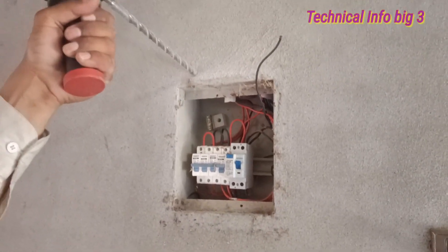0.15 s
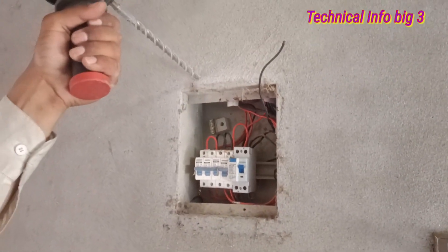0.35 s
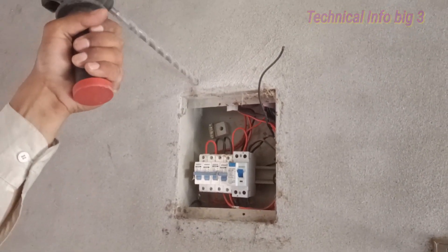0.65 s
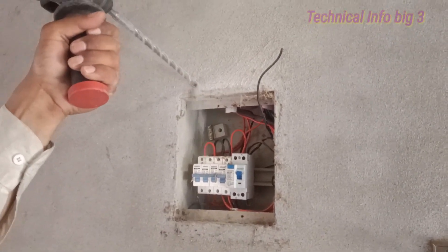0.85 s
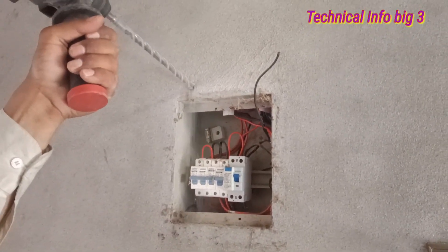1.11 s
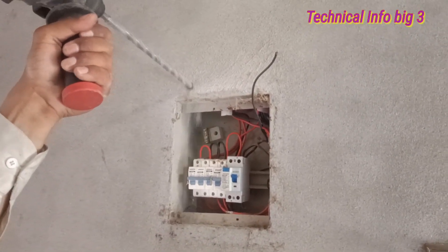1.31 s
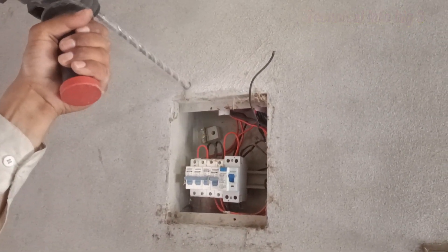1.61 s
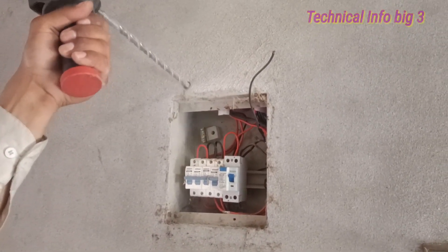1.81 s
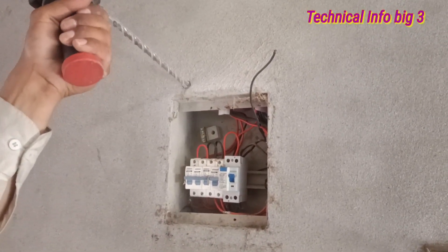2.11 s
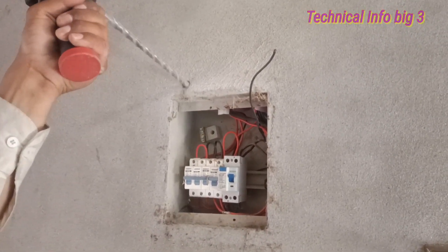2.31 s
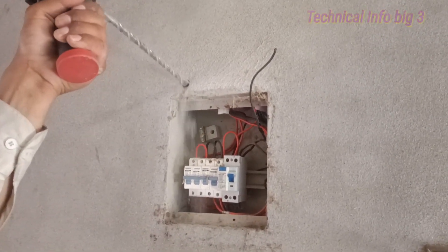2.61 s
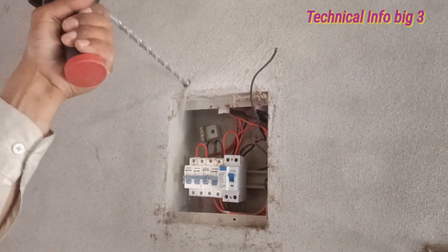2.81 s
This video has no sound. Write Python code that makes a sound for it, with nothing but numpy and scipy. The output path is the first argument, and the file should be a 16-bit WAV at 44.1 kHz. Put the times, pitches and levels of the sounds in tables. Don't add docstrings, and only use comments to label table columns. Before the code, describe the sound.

A hammer drill, very close in a bare, echoing plaster room, whines and hisses up, then coasts down by 0.55 s with scattered ticks. A louder second spin peaks near 0.8 s and sags; a third climbs highest around 1.5 s. From 1.7 s steel blows crack, ring and boom in the wall, slowing toward 2.2 s. Faster, slightly clipped hammering surges at 2.35-2.75 s, then slows. Faint street rumble.

```python
import sys
import numpy as np
from scipy import signal
from scipy.fft import rfft, irfft, next_fast_len
from scipy.io import wavfile
from scipy.ndimage import uniform_filter1d, map_coordinates

SR = 44100
rng = np.random.default_rng(int(sys.argv[2]) if len(sys.argv) > 2 else 0)


def unload_audio(sound):
    columns = np.transpose(np.atleast_2d(sound))
    steps = np.round(np.clip(columns, -1, 1) * 32767)
    wavfile.write(sys.argv[1], SR, steps.astype(np.int16))


def makeup_ratio(level_db):
    decades = np.asarray(level_db, float) / 20
    return 10 ** decades


N = 130095


def unit(x):
    return x / np.sqrt(np.mean(x ** 2) + 1e-20)


def along(points, hz):
    point_hz, value = np.transpose(points)
    return np.interp(np.log(hz + 1), np.log(point_hz + 1), value)


def wobble(rate_hz):
    knots = rng.standard_normal(int(N * rate_hz / SR) + 4)
    return map_coordinates(knots, [np.arange(N) * rate_hz / SR])


def filtered(x, response):
    size = next_fast_len(N + SR // 2)
    spectrum = rfft(x, size) * response(np.fft.rfftfreq(size, 1 / SR))
    return irfft(spectrum, size)[..., :N]


def coloured(x, curve):
    return filtered(x, lambda f: makeup_ratio(along(curve, f)))


def body(peaks):
    def response(f):
        total = 0
        for k, (hz, width, db) in enumerate(peaks):
            total = total + (-1) ** k * makeup_ratio(db) * 1j * f * width / (hz * hz - f * f + 1j * f * width)
        return total
    return response


# start_s, crack_db, low_ring_db, high_ring_db, wall_db
BLOWS = [(1.7063, -5, -26, -26, -22.5), (1.7357, 1, -17, -29, -14), (1.7666, -2, -25, -25, -14.5),
         (1.8003, -1, -17, -29, -9.5), (1.8378, -16, -15.5, -25, -13), (1.8758, -4, -25, -26, -14),
         (1.9195, -5.5, -20.5, -31, -14.5), (1.9685, -1.5, -17, -23, -15), (2.0243, -5.5, -24, -27, -16),
         (2.0925, -12, -18.5, -33, -17), (2.1297, -34, -39, -48, -21), (2.2027, -13, -28, -25, -23),
         (2.3014, -11, -23, -27, -23.5), (2.3532, -0.5, -28, -31, -15.5), (2.3881, 0, -17, -18, -14.5),
         (2.4202, -2, -15, -29, -10), (2.4504, -8, -17, -34, -14), (2.4759, -0.5, -18, -30, -14.5),
         (2.5043, -4, -16, -24, -12), (2.5296, 4, -28, -23, -9), (2.5596, 1.5, -22, -10.5, -12.5),
         (2.5835, -9, -13, -20, -14), (2.6127, 0.5, -16, -16, -12), (2.6436, -3, -12, -26, -17.5),
         (2.6785, -4, -16, -23, -13), (2.7152, -6, -16.5, -16, -17), (2.7576, -5, -21.5, -24, -16.5),
         (2.805, -12, -28, -43, -25), (2.8637, -13, -39, -25, -22), (2.9354, -14, -36, -38, -29)]
# start_s, level_db
TICKS = [(.0353, -19), (.079, -15), (.106, -15), (.122, -12), (.148, -13), (.233, -6), (.251, -13),
         (.294, -11), (.358, -17), (.451, -21), (.475, -17), (.49, -23), (.599, -22), (.621, -15),
         (.695, -7), (.745, -7), (1.051, -12), (1.106, -10), (1.157, -14), (1.233, -10), (1.369, -9),
         (2.211, -25)]
# pitch_hz, t60_s, level_db (over its ring column)
BIT_MODES = [(8420, .025, 6), (11550, .08, -3)]
# freq_hz, level_db
BLOW_COLOUR = [(200, -30), (3000, -14), (6000, -5), (8500, 0), (12000, -3), (15000, -7)]
# freq_hz, level_db
TICK_COLOUR = [(200, -24), (1000, -9), (2500, 0), (5000, -3), (8000, -9), (15000, -14)]


def steel(events, colour):
    crack_t60_s, rebound_s, rebound_db, ring_scatter_db = 0.007, 0.003, -2, 2
    rings, cracks = np.zeros((2, N + SR)), np.zeros((2, N + SR))
    t = np.arange(SR // 12) / SR
    for start_s, crack_db, *ring_db in events:
        rebound = (rebound_s * rng.uniform(0.29, 1.2), rebound_db)
        for late_s, loss_db in ((0, 0), rebound):
            start = round((start_s + late_s) * SR)
            at = slice(start, start + len(t))
            for (hz, t60, mode_db), level in zip(BIT_MODES, ring_db):
                phase = 2 * np.pi * (hz * rng.normal(1, 0.012) * t + rng.random((2, 1)))
                scatter = rng.normal(0, ring_scatter_db)
                rings[:, at] += makeup_ratio(level + loss_db + mode_db + scatter - 60 * t / t60) * np.sin(phase)
            fall = makeup_ratio(crack_db + loss_db - 60 * t / crack_t60_s)
            cracks[:, at] += fall * rng.standard_normal((2, len(t)))
    return rings[:, :N] + makeup_ratio(-0.5) * coloured(cracks[:, :N], colour)


# pitch_hz, width_hz, level_db
WALL = [(134, 173, -18), (406.3, 17.4, -5.5), (475, 12, 4.5), (505.3, 15, -1), (546.2, 14, -3),
        (619, 24.5, -2), (677, 48, -10), (1320, 146, -14)]


def wall_boom(motor_db):
    rise_s, shudder_t60_s, low_hz = 0.0056, 0.042, 108
    push_db, thump_db, shake_db = 27.5, 21.5, 4
    push = np.zeros(N)
    for start_s, *_, wall_db in BLOWS:
        push[round(start_s * SR)] = makeup_ratio(wall_db)
    t = np.arange(SR // 5) / SR
    shape = (1 - np.exp(-t / rise_s)) * makeup_ratio(-60 * t / shudder_t60_s)
    shudder = signal.fftconvolve(push, shape)[:N] * rng.standard_normal(N)
    shake = makeup_ratio(motor_db) * rng.standard_normal(N)
    force = makeup_ratio(push_db) * (shudder + makeup_ratio(thump_db) * push) + makeup_ratio(shake_db) * shake
    return filtered(force, lambda f: body(WALL)(f) * (1j * f / (low_hz + 1j * f)) ** 2)


# pitch_hz, width_hz, level_db
GRIND = [(8100, 990, -7), (11350, 690, -1), (14200, 16000, -5.5)]


def bit_grind():
    ease_s, grind_db = 0.041, -21
    bite = np.zeros(N)
    for start_s, crack_db, *_ in BLOWS:
        bite[round(start_s * SR)] = makeup_ratio(crack_db)
    t = np.arange(SR // 5) / SR
    pressure = signal.fftconvolve(bite, np.exp(-t / ease_s))[:N]
    return makeup_ratio(grind_db) * pressure * unit(filtered(rng.standard_normal((2, N)), body(GRIND)))


# time_s, level_db, gear_mesh_hz
FIRST_PULL = [
    (0, -36, 240),
    (.033, -27, 300),
    (.038, -22.5, 330),
    (.11, -18, 500),
    (.2, -17, 570),
    (.3, -18, 481),
    (.43, -28.5, 360),
    (.49, -29.5, 291),
    (.56, -36, 225),
]
# time_s, level_db, gear_mesh_hz
LATER_PULLS = [
    [(0.585, -27, 300), (0.64, -15, 440), (0.69, -11.5, 565), (0.745, -11, 700), (0.785, -10, 772),
     (0.87, -12, 675), (0.945, -12, 575), (1.03, -15.5, 455), (1.19, -20, 340)],
    [(1.22, -17, 390), (1.29, -13, 600), (1.36, -10.5, 757), (1.44, -11, 880), (1.51, -11, 935),
     (1.61, -12, 810), (1.83, -15.5, 568), (1.95, -17, 424), (2.2, -29, 230)],
    [(2.26, -19, 244), (2.278, -20.5, 309.9), (2.314, -20, 425), (2.34, -14.5, 455.4), (2.37, -13, 562),
     (2.46, -16, 766.9), (2.55, -18, 791.0), (2.742, -19.5, 511.5), (2.95, -28.5, 265.2)],
]


def motor_speed():
    time_s, level_db, mesh_hz = np.concatenate([FIRST_PULL, *LATER_PULLS]).T
    t = np.arange(N) / SR
    return np.interp(t, time_s, level_db), uniform_filter1d(np.interp(t, time_s, mesh_hz), size=1300)


# multiple_of_mesh, level_db
TEETH = [(1.9, -2), (2.43, -4), (3, 2), (4, 1), (5, -3), (6, -5), (8, -8)]
# pitch_hz, width_hz, level_db
GEARBOX = [(1780, 200, -8), (2280, 220, 5), (2800, 500, -2), (3700, 700, -12)]


def gear_whine(motor_db, mesh_hz):
    whine_db, flutter_db, jitter = -3, 2.5, 0.0015
    per_octave_db, full_hz = 2.2, 900
    loaded_s, loaded_db = 2.2, -8
    turn = 2 * np.pi * np.cumsum(mesh_hz * (1 + jitter * wobble(39.56))) / SR
    teeth = np.zeros(N)
    for multiple, db in TEETH:
        level = makeup_ratio(db + flutter_db * wobble(35.09))
        teeth += level * np.sin(multiple * turn + rng.uniform(0, 2 * np.pi))
    speed_db = per_octave_db * np.log2(mesh_hz / full_hz)
    load_db = loaded_db * (np.arange(N) / SR > loaded_s)
    return makeup_ratio(whine_db) * filtered(makeup_ratio(motor_db + speed_db + load_db) * teeth, body(GEARBOX))


# pitch_hz, width_hz, level_db
HOUSING = [(1780, 200, -12), (2280, 190, 0), (2700, 200, -6), (3020, 350, -2), (4450, 700, -12),
           (5200, 400, -14), (8500, 600, -18), (10800, 1200, -17)]
# freq_hz, level_db (per Hz)
FAN_AIR = [(40, -35), (300, -28), (600, -16), (950, -17), (2300, -6.5), (5000, -17.5), (7500, -28),
           (15500, -31)]


def housing_hiss(motor_db):
    rattle = unit(filtered(makeup_ratio(4 * wobble(500)) * rng.standard_normal(N), body(HOUSING)))
    air = unit(coloured(makeup_ratio(2.8 * wobble(300)) * rng.standard_normal(N), FAN_AIR))
    return makeup_ratio(motor_db - 3 + 1.7 * wobble(17)) * unit(rattle + air)


# freq_hz, t60_s
ROOM_DECAY = [(150, 0.43), (600, 0.47), (3000, 0.65), (12000, 0.28)]
# freq_hz, level_db (against the direct sound)
ROOM_COLOUR = [(100, 11), (1000, 2), (3000, 0.5), (6000, 9), (14000, -6.5)]


def room(x, count=30):
    out = np.zeros((2, N + SR))
    position = np.arange(N) * count / N
    for k in range(count + 1):
        hz, s, z = signal.stft(rng.standard_normal((2, SR // 4)), SR, nperseg=256)
        share = (1 / (1 + (hz / 700) ** 2))[:, None]
        z[1] = np.sqrt(share) * z[0] + np.sqrt(1 - share) * z[1]
        t60 = np.clip(along(ROOM_DECAY, hz), 0.03, 2)[:, None]
        fall = makeup_ratio(-60 * s / t60)
        fall *= makeup_ratio(along(ROOM_COLOUR, hz))[:, None] / np.linalg.norm(fall, axis=1, keepdims=True)
        tail = signal.istft(z * fall, SR, nperseg=256)[1] / np.sqrt(128)
        a, b = max(0, (k - 1) * N // count), (k + 1) * N // count
        fade = np.clip(1 - np.abs(position - k), 0, 1) ** 0.5
        wet = signal.fftconvolve((x * fade)[None, a:b], tail, axes=1)
        out[:, a + 200:][:, :wet.shape[1]] += wet
    return out[:, :N]


# freq_hz, level_db (per Hz)
STREET = [(25, -29), (100, -3), (300, -4), (1000, -1), (5000, -10), (15000, -88)]


def street_rumble():
    both, each = rng.standard_normal(N), rng.standard_normal((2, N))
    return makeup_ratio(-32.5) * unit(coloured(both + 0.4 * each, STREET))


def scene():
    motor_db, mesh_hz = motor_speed()
    hits = makeup_ratio(-3) * steel(np.array(BLOWS)[:, :4], BLOW_COLOUR) + steel(TICKS, TICK_COLOUR)
    boom = wall_boom(motor_db)
    whine = gear_whine(motor_db, mesh_hz)
    hiss = housing_hiss(motor_db)
    lag_s = np.array([[14 / 44100], [0]])
    near = hits + hiss + whine + boom + bit_grind()
    direct = filtered(near, lambda f: np.exp(-2j * np.pi * f * lag_s))
    wet = room(hiss + makeup_ratio(-9) * whine + makeup_ratio(-9) * hits[0] + makeup_ratio(-7.5) * boom)
    return makeup_ratio(0.46) * (direct + wet) + street_rumble()


def band_limit(x):
    return signal.sosfilt(signal.butter(12, 15680, fs=SR, output="sos"), x)


# freq_hz, left_over_right_db
PORTS = [(60, 1.5), (380, -2.5), (1200, -1.5), (2400, -3.5), (5000, 1), (8500, 7.5), (11000, 12.5),
         (14000, 3.5)]


def record(dry):
    top_hz, ceiling, knee = 15100, 1.02, 12
    halves = np.array([[0.5], [-0.5]])
    x = filtered(dry, lambda f: makeup_ratio(along(PORTS, f) * halves) / (1 + (f / top_hz) ** 24))
    x = x / (1 + np.abs(x / ceiling) ** knee) ** (1 / knee)
    return band_limit(x)


dry = scene()
out = record(dry)
unload_audio(out)
```